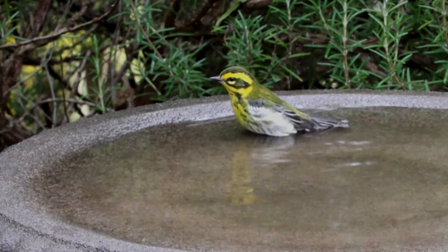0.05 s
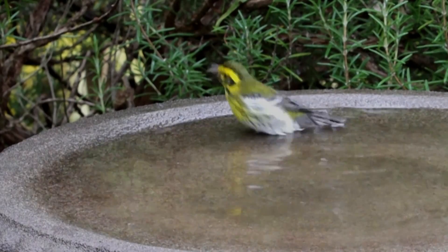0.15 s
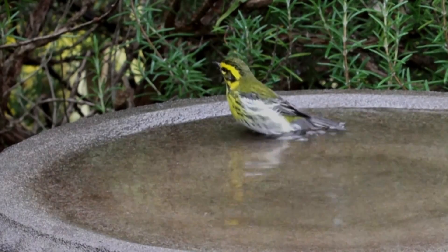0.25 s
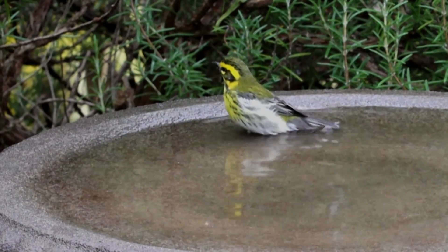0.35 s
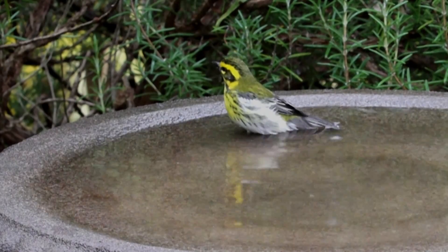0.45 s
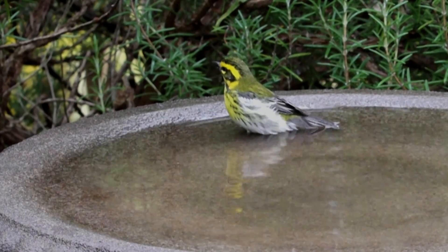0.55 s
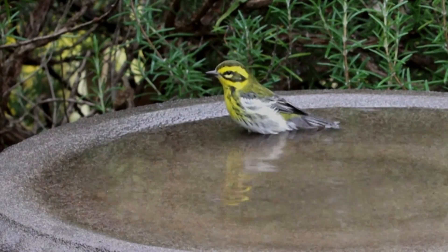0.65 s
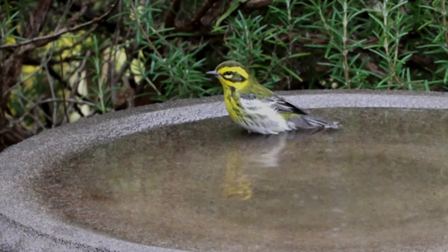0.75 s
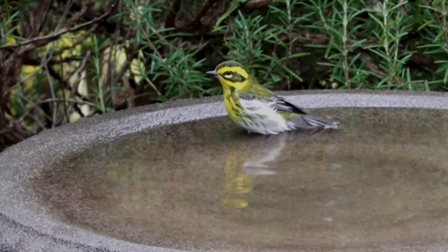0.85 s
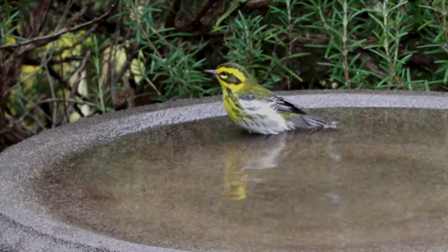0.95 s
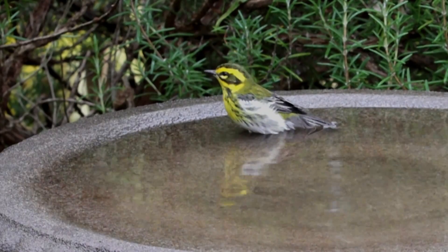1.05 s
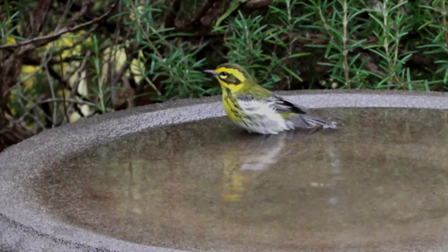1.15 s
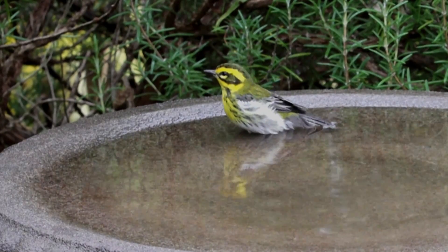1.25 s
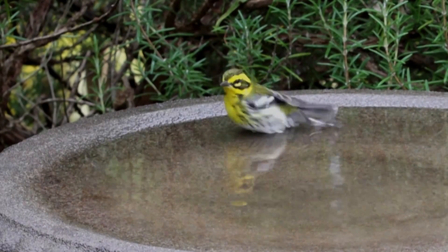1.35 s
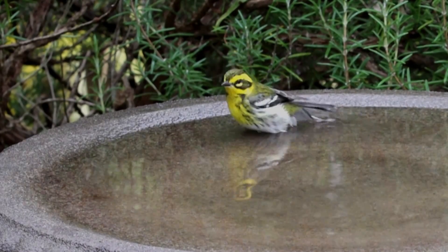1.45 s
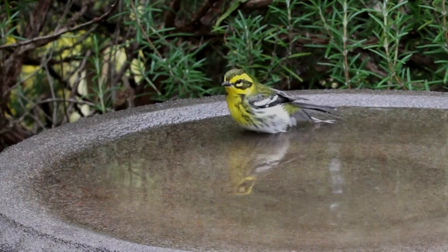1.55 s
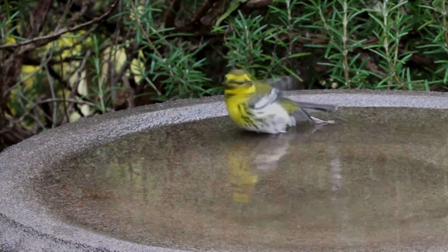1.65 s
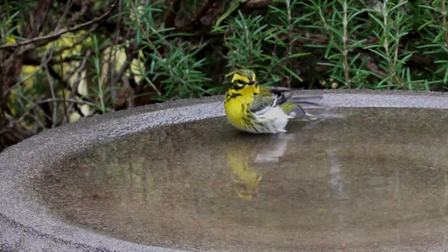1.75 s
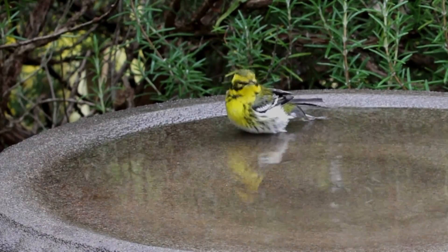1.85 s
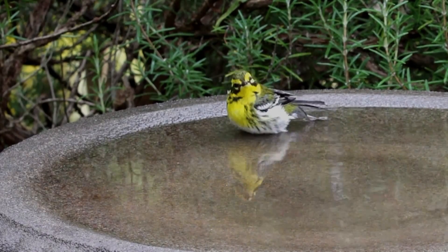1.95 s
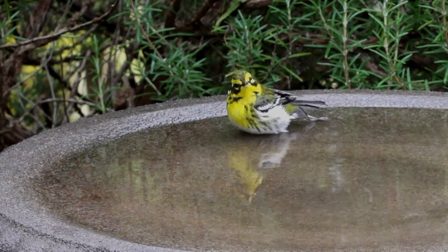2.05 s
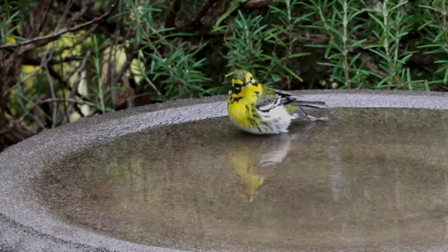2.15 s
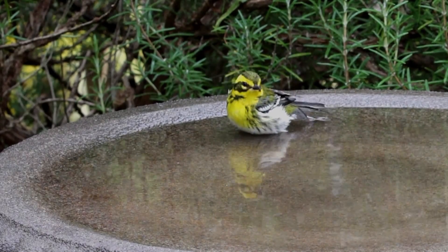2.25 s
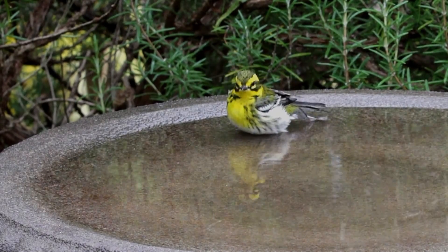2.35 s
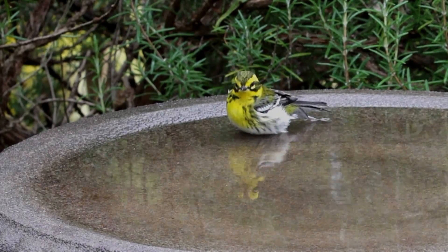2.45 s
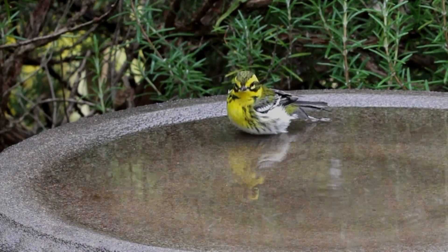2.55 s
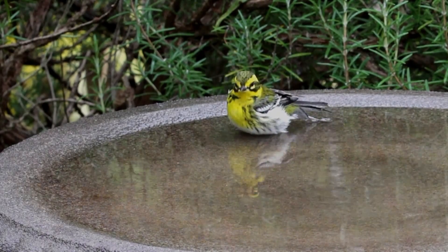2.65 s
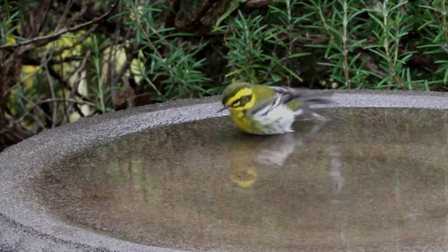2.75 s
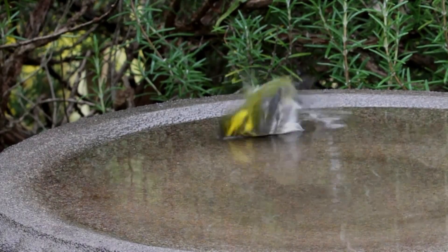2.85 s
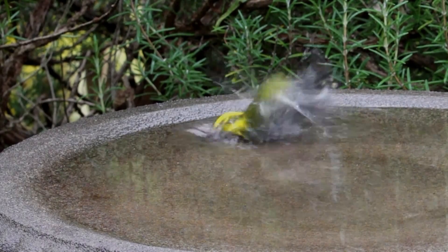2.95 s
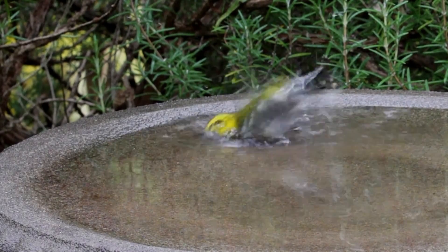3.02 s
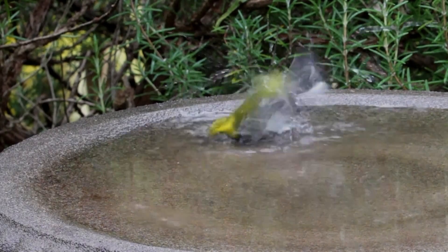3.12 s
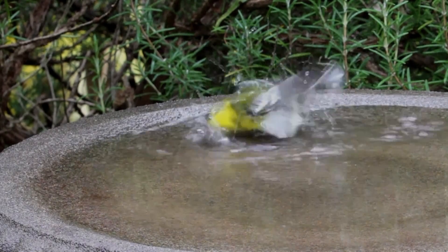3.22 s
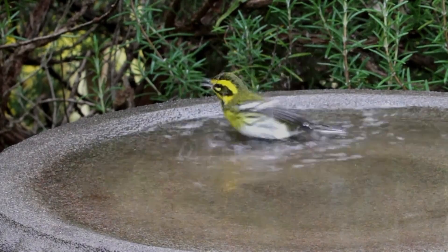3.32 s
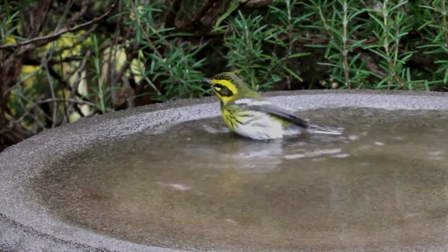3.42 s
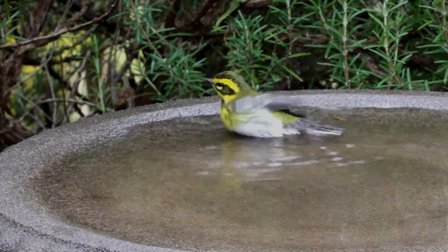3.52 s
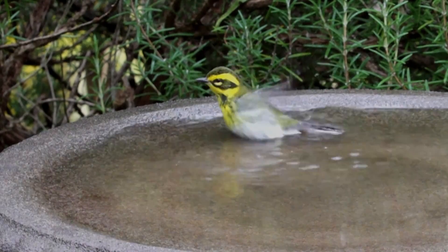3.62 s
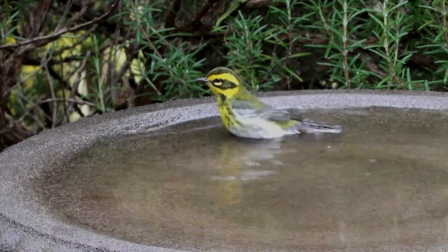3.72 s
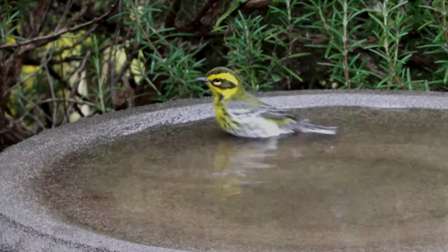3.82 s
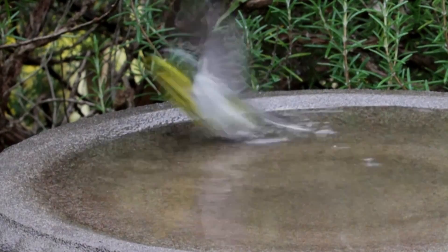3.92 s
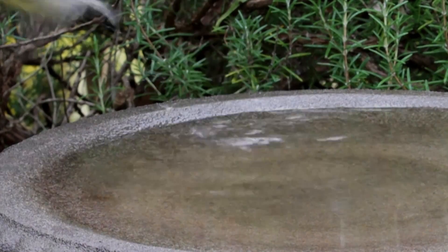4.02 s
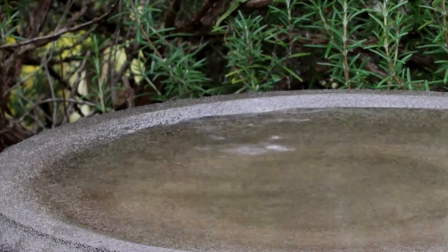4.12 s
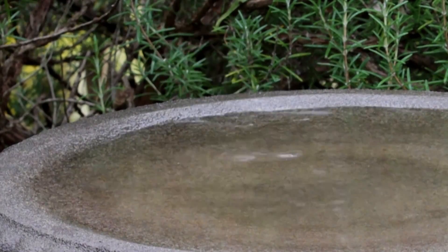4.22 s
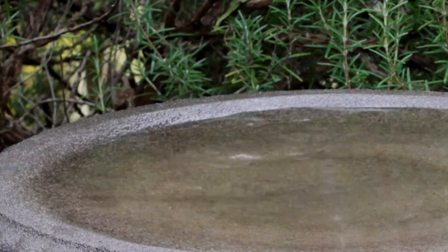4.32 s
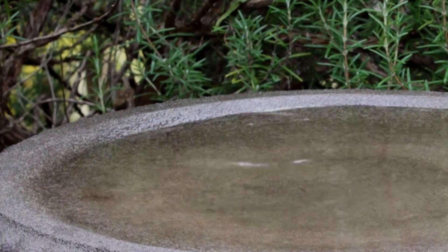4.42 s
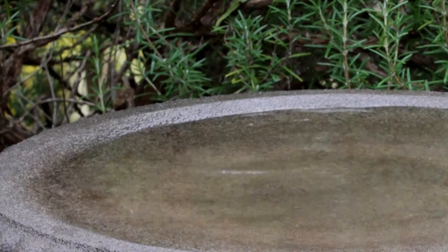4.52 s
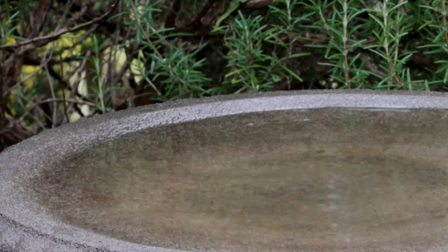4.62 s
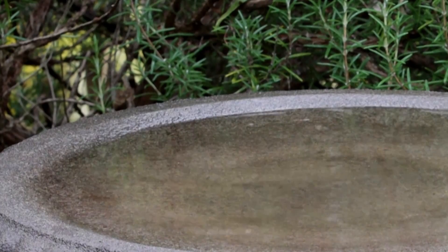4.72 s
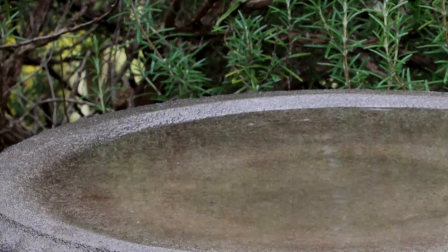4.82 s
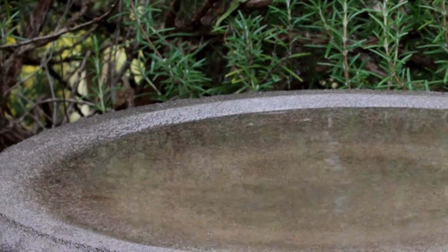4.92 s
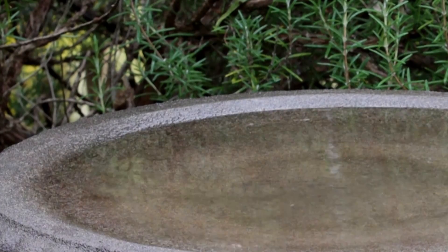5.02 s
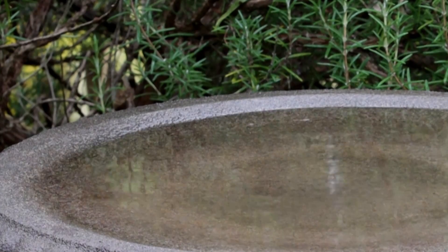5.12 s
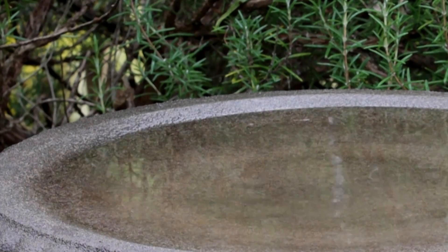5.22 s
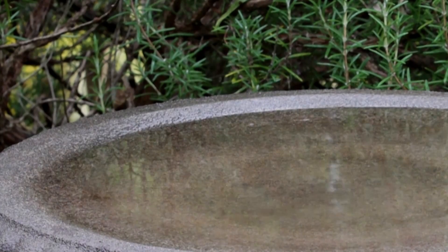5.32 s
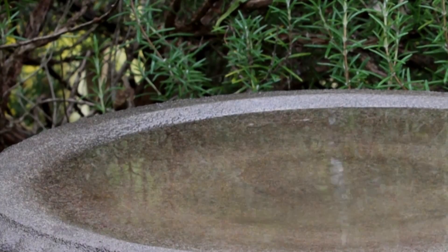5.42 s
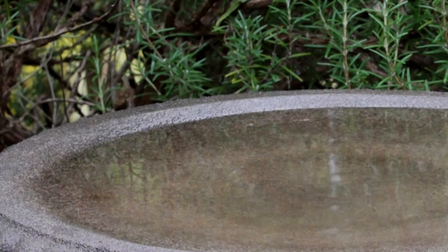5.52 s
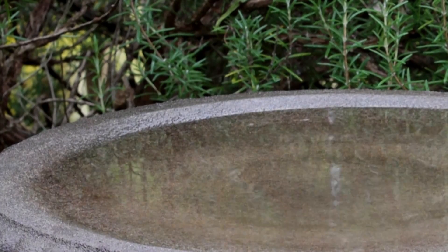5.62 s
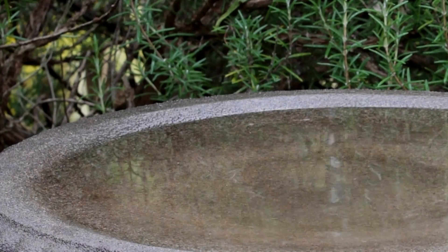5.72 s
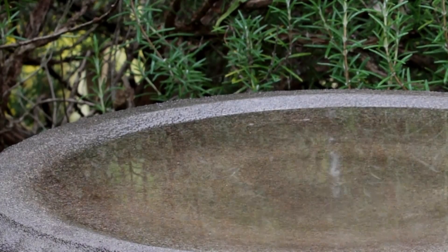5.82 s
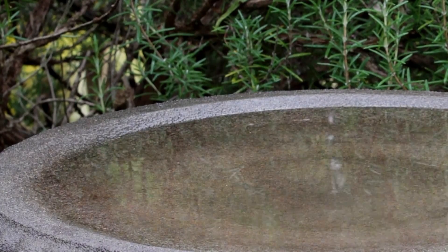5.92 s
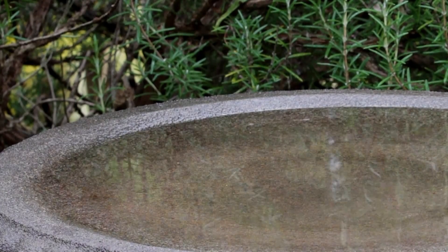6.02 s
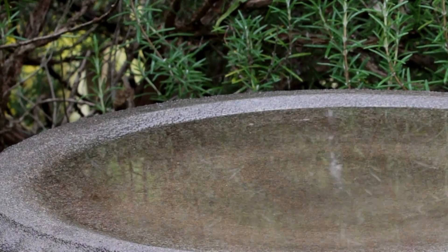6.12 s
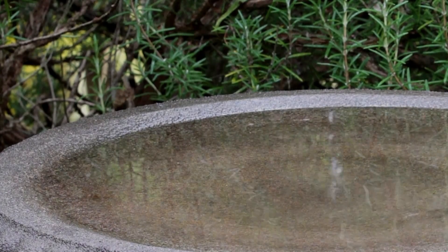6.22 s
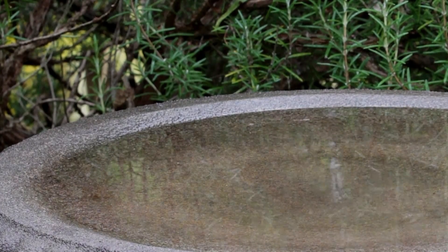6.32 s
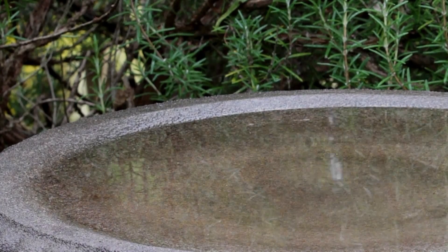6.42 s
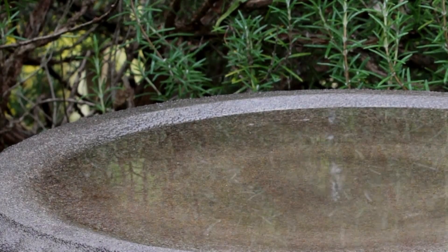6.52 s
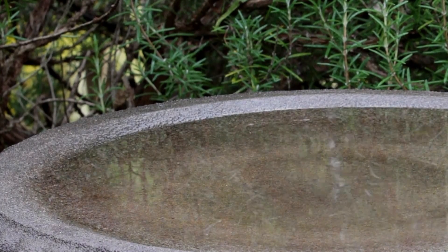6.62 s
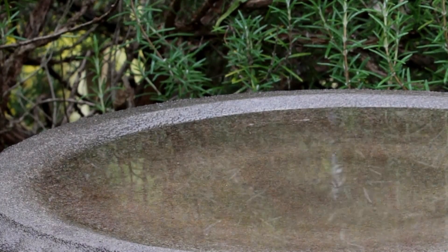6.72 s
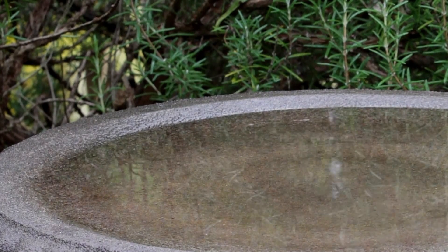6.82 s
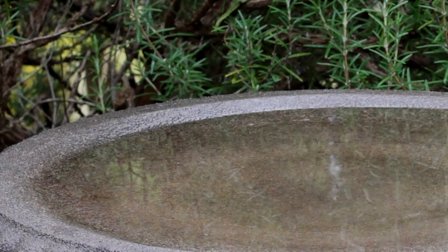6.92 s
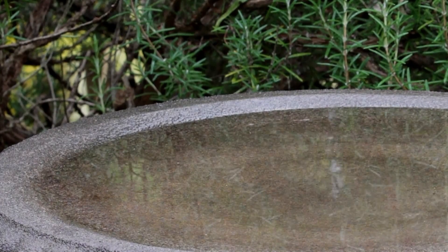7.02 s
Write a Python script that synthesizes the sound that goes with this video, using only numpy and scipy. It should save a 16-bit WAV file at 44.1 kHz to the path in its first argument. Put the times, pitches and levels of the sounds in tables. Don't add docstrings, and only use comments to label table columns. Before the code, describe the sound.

Garden birds chip and whistle over faint hiss; wings slap shallow water in a short flurry, then a wet, rapid flutter takes off into quiet.

```python
import sys
import numpy as np
from scipy import signal
from scipy.fft import rfft, irfft, next_fast_len
from scipy.io import wavfile
from scipy.ndimage import uniform_filter1d, map_coordinates

SR = 44100
rng = np.random.default_rng(int(sys.argv[2]) if len(sys.argv) > 2 else 0)


def wav_record(signal):
    frames = np.transpose(np.atleast_2d(signal))
    bounded = np.clip(frames, -1, 1)
    quanta = np.round(bounded * 32767).astype(np.int16)
    wavfile.write(sys.argv[1], SR, quanta)


def gain_from_db(level_db):
    decades = np.asarray(level_db, float) / 20
    return 10 ** decades


N = 311346

# f/Hz, correlation
HISS_LIKENESS = [(60, -0.75), (180, -0.24), (550, 0.93), (1650, 0.88), (4970, 0.11), (15000, 0.02)]
# t/s, peak level/dB, ring f/Hz
SLAPS = [(0.0099, -25, 1500), (0.0358, -35, 2870), (3.0666, -26.5, 3280), (3.0745, -23, 3090),
         (3.1168, -21, 2950), (3.1148, -20, 1840), (3.139, -31.5, 2800), (3.1653, -9.5, 2670),
         (3.2169, -29, 2400), (3.25, -27, 3300), (3.271, -14.5, 3700), (3.2685, -19, 2550),
         (3.11, -24, 2700), (3.133, -25, 2500), (3.1205, -19, 1800), (3.1625, -21, 3000),
         (3.4141, -19, 3200), (3.4195, -28, 2880), (3.7564, -31, 2500)]
# t/s, peak level/dB, ring f/Hz
PLINKS = [(.0099, -26, 2280), (.0099, -26, 2950), (.0358, -36, 2900), (3.2484, -23, 3290),
          (3.4195, -29, 2880), (3.165, -24, 2700), (4.255, -29, 3000), (4.338, -29, 2680),
          (4.376, -26, 1870), (4.459, -31, 1300), (4.5, -31, 1750), (4.542, -29, 1370), (4.583, -36, 1100)]
# start t/s, length t/s, f/Hz, level/dB, sag f/Hz
PEEPS = [(.145, .09, 3600, -49.5, 82), (.1, .05, 3250, -56, -300), (.235, .025, 3480, -55, 0),
         (5.145, 0.044, 3340, -49.5, 1), (5.712, 0.044, 3480, -48, 20), (5.722, 0.04, 3400, -51, 501),
         (5.775, .03, 3510, -50, 0), (5.822, 0.033, 3520, -50, 0), (5.975, 0.028, 3396, -42, 0),
         (6.012, 0.023, 3420, -47.5, -1), (5.985, 0.033, 3050, -52, -1), (5.678, .028, 7480, -52, 0),
         (5.685, .025, 6830, -52, 0), (5.93, .03, 7500, -58, -600), (6.365, 0.034, 3160, -48.5, 100),
         (6.37, .025, 3550, -55, 0), (5.7, .15, 2900, -58, 0), (5.16, .02, 3600, -53, 400),
         (6.51, 0.043, 3597, -54.5, 0)]
# loudest t/s, f/Hz, level/dB, tail t/s
HOARSE = [
    (.426, 4860, -43.5, 0.09),
    (.506, 5600, -40, 0.026),
    (.42, 4100, -39, 0.05),
    (.44, 3700, -41, .08),
    (.496, 3730, -41.5, 0.021),
    (3.108, 5900, -40, .03),
    (3.3, 4900, -50, 0.03),
    (2.222, 9900, -40, 0.043),
    (2.262, 9890, -26, 0.035),
]
# loudest t/s, f/Hz, level/dB, tail t/s
SINGLE_CHIPS = [
    (.412, 6300, -46, .02),
    (.5035, 6490, -22.5, .006),
    (.512, 6500, -36, .01),
    (.523, 6420, -39, .008),
    (.469, 6480, -34, .008),
    (.484, 6400, -40, .01),
]
# loudest t/s, f/Hz, level/dB, tail t/s
DOUBLE_CHIPS = [
    (.425, 6340, -27.5, 0.01),
    (.434, 6355, -15.5, 0.011),
    (.444, 6250, -29, 0.006),
    (.458, 6350, -44, 0.05),
]
# loudest t/s, f/Hz, level/dB, tail t/s
SWISH = [
    (4.197, 3650, -40, .03),
    (4.222, 3500, -42, .015),
    (4.266, 3050, -38, .012),
    (4.185, 1750, -41, .02),
    (3.285, 4600, -45, .02),
    (3.268, 5100, -43, .03),
    (.49, 4500, -44, .02),
    (.508, 5050, -46, .02),
]
# loudest t/s, f/Hz, level/dB, tail t/s
TRILLS = [
    (2.068, 7670, -48, 0.095),
    (5.282, 7710, -43.5, 0.091),
    (5.544, 7470, -43.5, 0.056),
]
# t/s, f/Hz, level/dB
NEAR_WHISTLE = [
    (2.18, 9250, -66),
    (2.207, 8830, -36),
    (2.217, 8625, -16.5),
    (2.243, 8600, -15),
    (2.25, 8680, -21),
    (2.258, 8790, -13),
    (2.272, 8920, -17),
    (2.287, 8975, -18),
    (2.295, 8900, -40),
]
# t/s, level/dB
SPRAY = [
    [(3.09, -49.5), (3.115, -49), (3.17, -51), (3.2, -68), (3.26, -51), (3.29, -53)],
    [(3.98, -80.5), (4.1, -45.5), (4.2, -33.5), (4.35, -38), (4.5, -38.5), (4.62, -46), (4.72, -66)],
]
# t/s, f/Hz, level/dB
LEAP = [
    (3.106, 4300, -55),
    (3.111, 5550, -33),
    (3.115, 5850, -26.5),
    (3.125, 6550, -30),
    (3.133, 6620, -27),
    (3.143, 6400, -27),
    (3.154, 6050, -22),
    (3.158, 5750, -26),
    (3.162, 4300, -52),
]
# t/s, f/Hz, level/dB
SLIDE = [
    (3.227, 4200, -55),
    (3.232, 5050, -38),
    (3.239, 5450, -31),
    (3.246, 5350, -34),
    (3.252, 5050, -32),
    (3.258, 4550, -32),
    (3.261, 4350, -50),
]
# start t/s, length t/s, top f/Hz, level/dB, swell level/dB
ARCHES = [
    (5.632, .042, 6880, -35.5, 1.5),
]
# loudest t/s, f/Hz, level/dB, tail t/s
HOOK = [
    (3.262, 3350, -38, .008),
    (3.281, 3760, -32, .009),
    (3.299, 3650, -39, .03),
]
# t/s, f/Hz, level/dB
BUZZ = [
    (3.306, 3330, -50),
    (3.317, 3320, -41),
    (3.345, 3310, -35.5),
    (3.372, 3310, -37.5),
    (3.38, 3300, -42),
    (3.398, 3290, -39),
    (3.409, 3250, -50),
]
# t/s, peak level/dB, ring f/Hz
BEATS = [(4.05, -21, 2600), (4.093, -33, 1700), (4.132, -27, 2600), (4.172, -22, 2200), (4.214, -13, 2600),
         (4.254, -18, 2900), (4.294, -17.5, 1800), (4.337, -17, 2700), (4.376, -16, 1900),
         (4.418, -26, 1400), (4.458, -23, 1500), (4.5, -21, 1800), (4.541, -20, 1500), (4.583, -26, 1200),
         (4.625, -30, 1200)]
# t/s, peak level/dB, ring f/Hz
FLICKS = [(4.06, -28.5, 2800), (4.115, -28.5, 3000), (4.119, -28.5, 2400), (4.136, -27.5, 2200),
          (4.168, -24.5, 1800), (4.224, -25, 2100), (4.238, -24.5, 2200), (4.256, -25, 1700),
          (4.173, -23, 2500), (4.267, -28, 3100), (4.424, -27, 2600), (4.461, -25, 1300)]
# f/Hz, level/dB
WATER_COLOUR = [(400, -44), (530, -10.5), (900, -5.5), (2500, 2.5), (4000, 0), (5200, -10), (7000, -23),
                (12000, -37)]
# f/Hz, level/dB
MIC_BAND = [(320, -50), (400, 0), (15740, 0), (15800, -90)]

# f/Hz, level/dB
UNDER = [(330, -70), (450, -47), (880, -35.5), (1050, -16), (11500, -14.5)]
# t/s, f/Hz
CEILING = [(0, 9900), (1.4, 10220), (2.2, 11340), (3, 10920), (3.5, 10820), (4.6, 9210), (6.5, 8950),
           (7.1, 8450)]
# start t/s, end t/s, start f/Hz, end f/Hz, width f/Hz
SCRUBBED = [(4.5, 6.63, 10240, 10260, 2010), (4.88, 5.96, 10410, 10960, 3010),
            (5.06, 6.31, 160, 1660, 1210), (5.62, 7.9, 750, 2100, 2200)]
# start t/s, end t/s, start f/Hz, end f/Hz, width f/Hz
LIGHT = [(.9, 1.22, 880, 1180, 330), (2.13, 2.3, 1200, 1150, 300), (.75, 1.75, 8540, 9740, 1720),
         (1.6, 3.05, 9470, 10230, 2093), (2.9, 3.85, 9050, 8570, 3390), (3.6, 4.48, 9180, 9220, 1502),
         (-.4, .75, 2530, 2560, 3010), (.3, .92, 2840, 2900, 2000), (.5, 1.4, 2640, 3030, 730),
         (1.3, 2.12, 3470, 3620, 3520), (1.95, 2.48, 3950, 4070, 2520), (2.62, 3.1, 2170, 1700, 1730),
         (2.83, 3.72, 4150, 4890, 5770), (5.3, 6.81, 7470, 6880, 3260), (5.05, 6.1, 2633, 2456, 903),
         (5.9, 6.75, 2600, 4130, 1110)]
# start t/s, end t/s, start f/Hz, end f/Hz, width f/Hz
AIRY = [(3.72, 4.76, 14810, 15610, 1810), (6.3, 7.71, 14600, 12200, 5600)]
# start t/s, end t/s, start f/Hz, end f/Hz, width f/Hz
PLAIN = [(3.88, 5.15, 1010, 907, 920), (1.05, 1.95, 540, 560, 130), (.4, 1.1, 420, 450, 90)]
# start t/s, end t/s, start f/Hz, end f/Hz, width f/Hz
FIRM = [(-.2, .31, 6300, 8700, 2710), (.21, .81, 9310, 9020, 1410), (.41, 1.12, 910, 1900, 750),
        (.71, 1.16, 8810, 7020, 1210), (.76, 1.84, 850, 800, 420), (.86, 1.31, 3710, 4210, 1610),
        (.97, 1.46, 7020, 7160, 710), (1.19, 1.51, 4610, 5360, 710), (1.36, 1.73, 7020, 8810, 710),
        (2.06, 2.6, 1700, 2600, 1100), (2.28, 2.72, 1500, 1500, 1050), (2.43, 2.81, 3210, 4010, 2610),
        (2.69, 3.64, 710, 720, 540), (3.5, 3.95, 800, 850, 350), (3.81, 4.47, 7610, 7960, 1110),
        (4.43, 4.96, 8510, 9110, 1810), (6.57, 6.96, 2700, 3500, 900), (6.78, 7.5, 2950, 3100, 1100),
        (6.73, 7.6, 6900, 5300, 6110)]
# start t/s, end t/s, start f/Hz, end f/Hz, width f/Hz
HARD = [(2.03, 2.56, 1450, 2250, 650), (5.14, 5.86, 800, 1500, 900), (5.79, 7.4, 441, 426, 91),
        (6.04, 6.43, 5310, 5210, 610)]
# start t/s, end t/s, start f/Hz, end f/Hz, width f/Hz
HARDER = [(-.2, .79, 705, 715, 405), (1.8, 2.73, 810, 800, 450), (4.88, 5.34, 1700, 1480, 1050),
          (6.64, 7.4, 9210, 9450, 1700), (6.68, 7.5, 1210, 1300, 750)]
# start t/s, end t/s, start f/Hz, end f/Hz, width f/Hz
SPARED = [(-.2, .21, 2800, 2700, 3460), (.15, .33, 3460, 3600, 2230), (.28, .73, 5190, 5240, 4370),
          (.65, .8, 4060, 3910, 1155), (1.57, 1.95, 6290, 5540, 780), (2.15, 2.5, 5400, 5280, 244),
          (1.83, 2.2, 9220, 8400, 2000), (2.01, 2.59, 8650, 8600, 2880), (2.5, 2.7, 9440, 9840, 1010),
          (2.83, 3.0, 4340, 4350, 2000), (2.92, 3.18, 4170, 4500, 6720), (3.1, 3.65, 4290, 4970, 5650),
          (3.55, 3.73, 6230, 7020, 1510), (4.8, 5.0, 7900, 7750, 450), (4.93, 5.2, 7800, 7600, 1090),
          (4.86, 5.0, 5350, 4900, 350), (5.01, 5.5, 7800, 7250, 1936), (5.25, 5.68, 7460, 7320, 3520),
          (5.5, 5.99, 6800, 5700, 1200), (5.6, 5.8, 7400, 6600, 900), (5.02, 5.5, 7300, 6000, 1000),
          (4.93, 5.3, 4900, 3230, 1300), (5.08, 6.45, 3390, 3437, 1634), (6.2, 6.66, 3300, 4260, 1200)]
# start t/s, end t/s, start f/Hz, end f/Hz, width f/Hz
FLIGHT = [(3.94, 4.12, 1502, 4200, 2083), (3.98, 4.75, 1350, 1500, 1648), (4.02, 4.56, 3600, 3600, 5910),
          (4.3, 4.73, 5500, 2500, 2300), (4.5, 4.82, 3000, 2050, 1400)]
# start t/s, end t/s, start f/Hz, end f/Hz, width f/Hz
UNTOUCHED = [(.395, .6, 4700, 5230, 3560), (3.08, 3.3, 2600, 2940, 2240), (3.25, 3.45, 3300, 3400, 1700),
             (3.99, 4.2, 1500, 2100, 1580), (4.03, 4.52, 2800, 3160, 4512), (4.1, 4.67, 1210, 1210, 1298),
             (4.3, 4.68, 3700, 1500, 2800)]
# strokes, gain left level/dB, bluntness of the ends (2 = oval)
BRUSHES = [
    (SCRUBBED, -46, 2.6), (LIGHT, -8, 3), (AIRY, -20.5, 3.2), (PLAIN, -13, 2.2), (FIRM, -24.5, 1.9),
    (HARD, -32.5, 1.9), (HARDER, -39, 3.5), (SPARED, 1.6, 3.6), (FLIGHT, -1, 4.05), (UNTOUCHED, 9.1, 2.9)]


def unit(x):
    return x / np.sqrt(np.mean(abs(x) ** 2) + 1e-20)


def along(points, hz):
    f, v = np.transpose(points)
    return np.interp(np.log(hz + 1), np.log(f + 1), v)


def coloured(x, points):
    m = next_fast_len(N + 4096)
    response = gain_from_db(along(points, np.fft.rfftfreq(m, 1 / SR)))
    return irfft(rfft(x, m) * response, m)[..., :N]


def garden(x, t60, wet_db, alike):
    t = np.arange(SR // 2) / SR
    build_up = 1 - np.exp(-t / .006)
    mid, side = rng.standard_normal((2, len(t))) * gain_from_db(-60 * t / t60) * build_up
    share = np.clip(alike, 0, 1)
    tail = np.sqrt(share) * mid + np.sqrt(1 - share) * np.array([side, -side])
    tail = tail / np.linalg.norm(mid)
    return x + gain_from_db(wet_db) * signal.fftconvolve(x[None], tail, axes=1)[:, :N]


def notes(contours, rough, smear_hz, warble_hz=0, swing_hz=0, throb=0, sharp=1, slowing=0):
    out = np.zeros(N)
    for rows in contours:
        s, hz, db = np.transpose(rows)
        t = np.arange(s[0], s[-1], 1 / SR)
        cycle = 2 * np.pi * warble_hz * t - np.pi * slowing * (t - s[0]) ** 2
        pitch = uniform_filter1d(np.interp(t, s, hz), 160, mode="nearest")
        pitch = pitch + swing_hz * (.5 + .5 * np.cos(cycle)) ** sharp
        tone = unit((1 + throb * np.cos(cycle)) * np.exp(2j * np.pi * np.cumsum(pitch) / SR))
        knots = rng.standard_normal((2, 400))
        a, b = (unit(map_coordinates(k, [(t - s[0]) * smear_hz])) for k in knots)
        share = np.clip(rough, 0, 1)
        spread = np.sqrt(1 - share) + np.sqrt(share / 2) * (a + 1j * b)
        fade = np.clip(np.minimum(t - s[0], s[-1] - t) / 0.0025, 0, 1)
        level = np.sqrt(2) * fade * gain_from_db(np.interp(t, s, db))
        out[round(s[0] * SR):][:len(t)] += level * (tone * spread).real
    return out


def swells(events, attack_s, rise_db, fall_db, sag_hz=0):
    return [[(s - attack_s, hz, db - rise_db), (s, hz, db), (s + tail, hz - sag_hz, db - fall_db)]
            for s, hz, db, tail in events]


def strikes(events, ring_s, puff_db, rise_s, fall_s):
    out = np.zeros(N + SR)
    t = np.arange(-SR // 100, SR // 30) / SR
    for s, db, hz in events:
        snap = np.exp(np.minimum(t / .00025, -t / ring_s)) * np.cos(2 * np.pi * hz * t)
        snap += gain_from_db(-6) * np.roll(snap, round(.0017 * SR))
        puff = gain_from_db(puff_db) * np.exp(np.minimum(t / rise_s, -t / fall_s)) * rng.standard_normal(len(t))
        out[round((s + .0012) * SR):][:len(t)] += gain_from_db(db) * (snap + puff)
    return out[SR // 100:][:N]


def hiss():
    m = next_fast_len(N)
    likeness = along(HISS_LIKENESS, np.fft.rfftfreq(m, 1 / SR))
    turn = np.arccos(np.clip(likeness, -1, 1)) / 2
    noise = rfft(rng.standard_normal((2, m)))
    mid, side = irfft(noise * [np.cos(turn), np.sin(turn)], m)[:, :N]
    return gain_from_db(-46.5) * np.array([mid + side, mid - side])


def wing_slaps():
    return gain_from_db(-12) * strikes(SLAPS, ring_s=.0005, puff_db=-9, rise_s=.0015, fall_s=.003)


def plinks():
    return gain_from_db(-10) * strikes(PLINKS, ring_s=.0019, puff_db=-14, rise_s=.001, fall_s=.003)


def peeps():
    edge_db = 11
    contours = [[(s, hz, db - edge_db), (s + length / 4, hz - sag / 4, db),
                 (s + .75 * length, hz - .75 * sag, db), (s + length, hz - sag, db - edge_db)]
                for s, length, hz, db, sag in PEEPS]
    return notes(contours, rough=.42, smear_hz=230)


def hoarse_notes():
    smeared = swells(HOARSE[:7], attack_s=0.012, rise_db=8.5, fall_db=14.5)
    high = swells(HOARSE[7:], attack_s=0.012, rise_db=6, fall_db=14)
    return notes(smeared, rough=.9, smear_hz=420) + notes(high, rough=.45, smear_hz=250)


def chips():
    single = swells(SINGLE_CHIPS, attack_s=.004, rise_db=12, fall_db=12)
    double = swells(DOUBLE_CHIPS, attack_s=0.0041, rise_db=17.5, fall_db=16.0)
    out = notes(single, rough=.1, smear_hz=150)
    return out + notes(double, rough=0.06, smear_hz=150, warble_hz=128, throb=3.6)


def feather_swish():
    return notes(swells(SWISH, attack_s=.015, rise_db=8, fall_db=9), rough=.9, smear_hz=500)


def trills():
    wide = swells(TRILLS[:1], attack_s=.036, rise_db=6.0, fall_db=8.5)
    slow = swells(TRILLS[1:], attack_s=.085, rise_db=12, fall_db=13.5)
    out = notes(wide, rough=0.2, smear_hz=125, warble_hz=62, swing_hz=609.3, throb=-0.21, sharp=5.1)
    return out + notes(slow, rough=0.3, smear_hz=120.0, warble_hz=72.4, swing_hz=190, throb=-0.18, sharp=2.3)


def near_whistle():
    return garden(notes([NEAR_WHISTLE], rough=0.003, smear_hz=199), t60=0.24, wet_db=-16, alike=0.9)


def spray(count=1900, length=192):
    out = np.zeros(N + length)
    for rows in SPRAY:
        s, db = np.transpose(rows)
        u, z = rng.random((count, 2)), rng.standard_normal((count, 1))
        u = u[u[:, 0] < s[-1] - s[0]]
        start = s[0] + u[:, :1]
        hz = np.interp(start, [4.3, 4.65], [2600, 1400]) * np.exp(.55 * z[:len(u)])
        cycles = hz * np.arange(length) / SR
        size = gain_from_db(np.interp(start, s, db) - 1.5 * np.log(u[:, 1:]))
        stroke = np.interp(start, [b[0] for b in BEATS], np.arange(len(BEATS)))
        size *= gain_from_db(4 * np.cos(2 * np.pi * stroke - .8) - .5)
        drops = size * np.exp(-cycles / 3) * np.sin(2 * np.pi * cycles)
        drops *= np.hanning(2 * length)[length:]
        at = (start * SR).astype(int) + np.arange(length)
        out += np.bincount(at.ravel(), drops.ravel(), N + length)
    return gain_from_db(-10) * out[:N]


def arched_whistles(count=40):
    top, depth, leg_depth = .42, .17, .17
    way = np.linspace(0, 1, count)
    off = np.where(way < top, 1 - way / top, (way - top) / (1 - top))
    bend = 1 - depth * off ** 2.0 - leg_depth * off ** 11
    fade_db = 36 * off ** 6
    contours = [np.transpose([s + way * length, hz * bend, db + swell * (2 * way - 1) - fade_db])
                for s, length, hz, db, swell in ARCHES]
    voices = notes(contours + [LEAP, SLIDE], rough=.05, smear_hz=260)
    return garden(voices, t60=0.15, wet_db=-12, alike=0.87)


def whistle_hook():
    contours = swells(HOOK, attack_s=0.004, rise_db=7, fall_db=6, sag_hz=150)
    return notes(contours, rough=.45, smear_hz=220)


def buzz():
    return notes([BUZZ], rough=0.15, smear_hz=200, warble_hz=400, throb=1.1, swing_hz=-60, slowing=900)


def wing_beats():
    return gain_from_db(-10.5) * strikes(BEATS + FLICKS, ring_s=.00045, puff_db=-7, rise_s=.002, fall_s=.0022)


def brush(x, edge_hz=220, edge_s=0.035):
    above_db, bottom_hz = -29.5, 330
    hz, t, z = signal.stft(x, SR, nperseg=512, noverlap=384)
    hz = hz[:, None]
    gain_db = along(UNDER, hz) + 0 * t
    above = np.clip((hz - np.interp(t, *np.transpose(CEILING))) / edge_hz + .5, 0, 1)
    gain_db += above * (above_db - gain_db)
    for strokes, left_db, blunt in BRUSHES:
        for start, end, start_hz, end_hz, width_hz in strokes:
            way = np.clip((t - start) / (end - start), 0, 1)
            half = width_hz / 2 * (1 - abs(2 * way - 1) ** blunt) ** (1 / blunt)
            centre = start_hz + way * (end_hz - start_hz)
            inside = (half - abs(hz - centre)) / min(edge_hz, width_hz / 2)
            during = np.minimum(t - start, end - t) / edge_s
            cover = np.clip(inside + .5, 0, 1) * np.clip(during, 0, 1) * (hz > bottom_hz)
            gain_db += cover * (left_db - gain_db)
    return signal.istft(z * gain_from_db(gain_db), SR, nperseg=512, noverlap=384)[1][..., :N]


def scene():
    bath = wing_slaps() + plinks() + spray() + wing_beats()
    bath = garden(coloured(bath, WATER_COLOUR), t60=0.09, wet_db=-11, alike=0.4)
    far = peeps() + hoarse_notes() + chips() + feather_swish() + trills() + whistle_hook() + buzz()
    far = garden(far, t60=.22, wet_db=-9.5, alike=.85)
    near = near_whistle() + arched_whistles()
    return near + far + brush(bath + hiss())


def low_pass(x):
    return signal.sosfilt(signal.butter(12, 16780, fs=SR, output="sos"), x)


def record(dry):
    mix = coloured(dry, MIC_BAND)
    return low_pass(mix)


dry = scene()
out = record(dry)
wav_record(out)
```